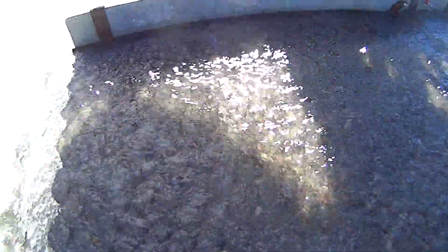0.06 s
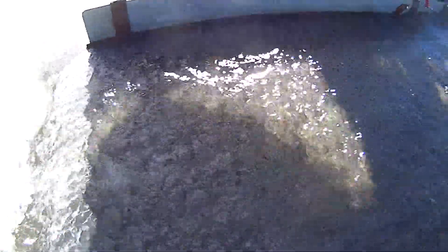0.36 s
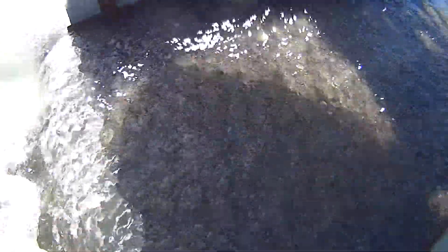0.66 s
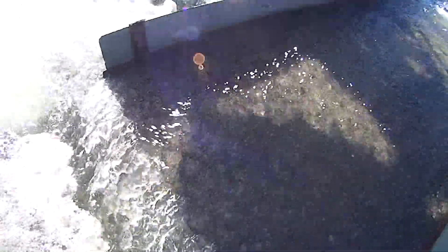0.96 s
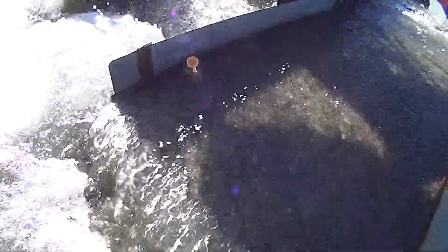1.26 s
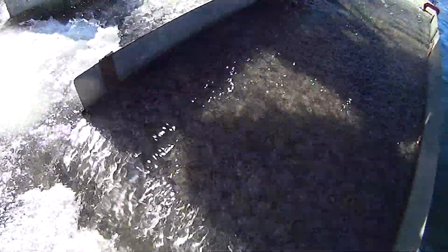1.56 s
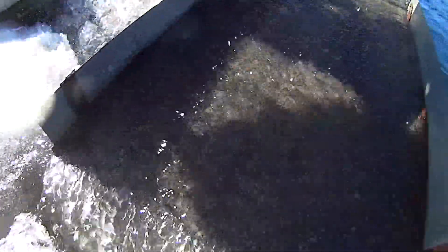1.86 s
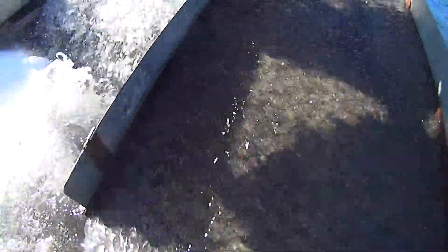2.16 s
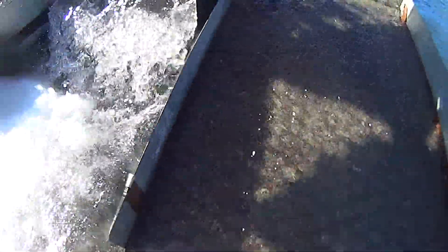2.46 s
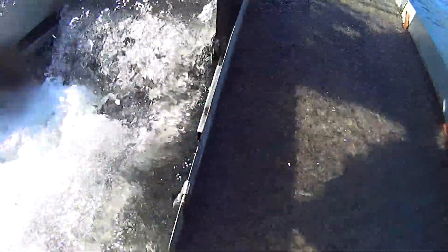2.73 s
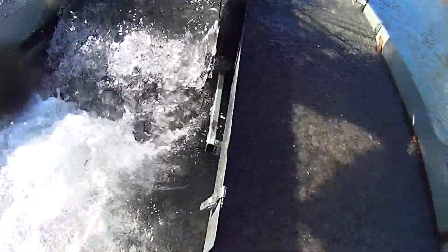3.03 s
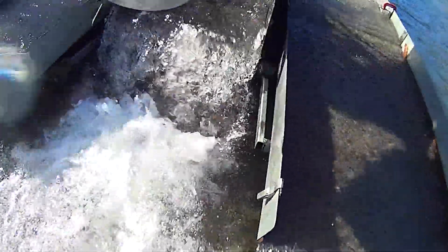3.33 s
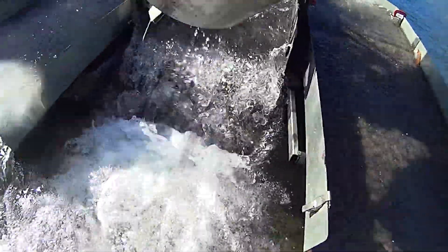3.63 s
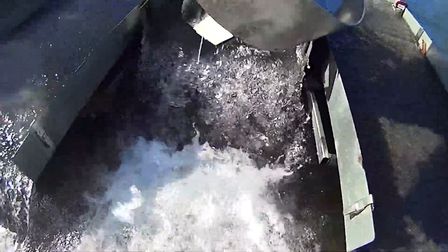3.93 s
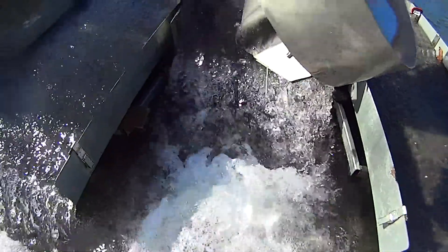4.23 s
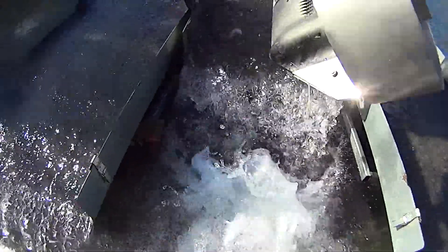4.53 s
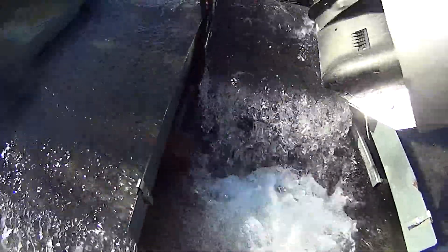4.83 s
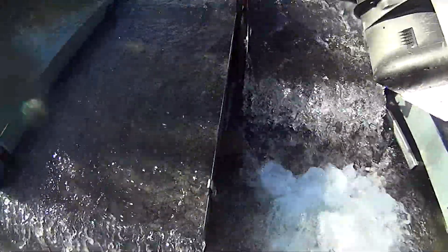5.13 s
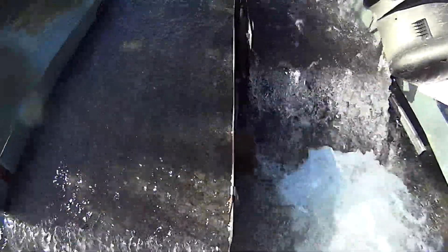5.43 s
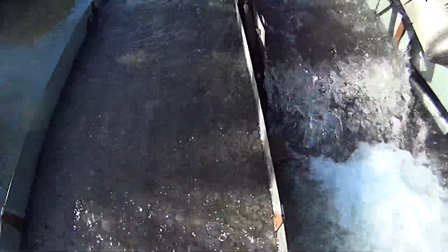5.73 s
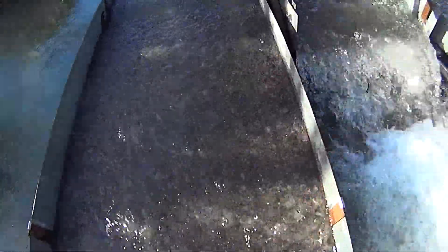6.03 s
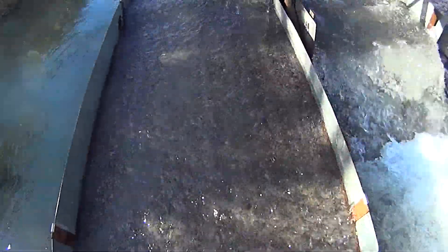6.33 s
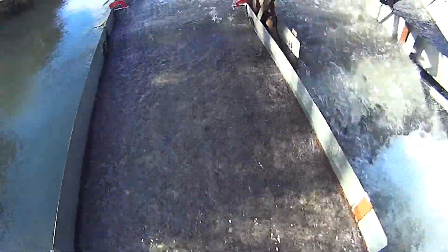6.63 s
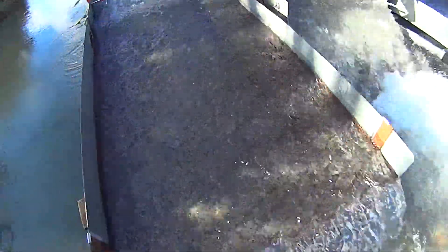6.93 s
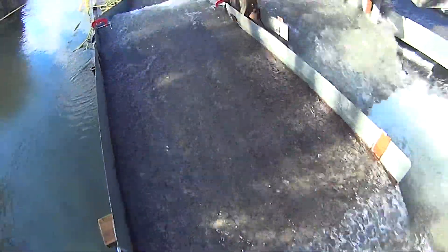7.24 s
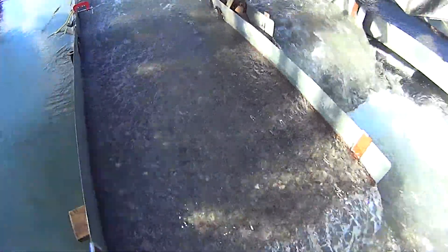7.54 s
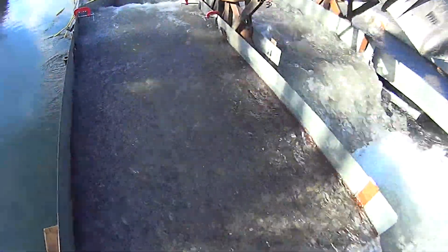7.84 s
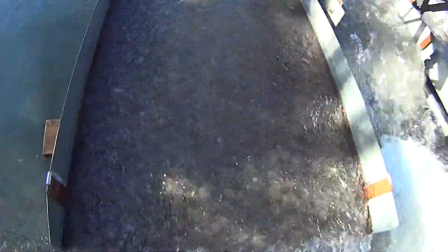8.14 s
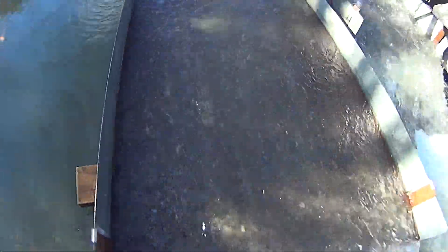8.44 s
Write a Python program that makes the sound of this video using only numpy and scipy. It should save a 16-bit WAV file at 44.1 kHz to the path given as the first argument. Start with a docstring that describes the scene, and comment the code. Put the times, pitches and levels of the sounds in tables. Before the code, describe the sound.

From the start a dredge's pump engine drones while water races down a sluice and churns into the river under a fine hiss of spray. Everything is heard from inside a waterproof plastic case, which adds a hollow, ringing colour. Drops tick on the case in the first half second, and six heavy splashes make it ring between about 0.7 and 1.3 seconds. More drops tick near 1.7, 4.8 and 6 seconds. From about 3.5 seconds part of the drone fades, thinnest around 6 seconds, while the water keeps churning. At about 7 seconds a hand knocks the case with several short, low thuds and rubs across it in rasping strokes until about 8.4 seconds. Two more splashes land at 7.5 seconds. The plastic clicks and crackles under the fingers, mostly after 8 seconds, as the churning dies down.

```python
"""A gold dredge at work, heard from inside a waterproof plastic case whose hollow rings at some pitches.
From the start a pump engine drones while water races down the sluice and churns into the river.
Drops tick on the case, and heavy splashes make it ring. Midway the microphone turns away from the
exhaust and part of the drone fades. From about 7 s a hand bumps the case and rubs across it, two more
splashes land, and the plastic clicks and crackles under the fingers as the churning dies down."""
import sys
import numpy as np
from scipy import signal
from scipy.fft import rfft, irfft, next_fast_len
from scipy.io import wavfile
from scipy.ndimage import map_coordinates

SR = 44100
rng = np.random.default_rng(int(sys.argv[2]) if len(sys.argv) > 2 else 0)


def persist_wave(psi):
    """Save psi, clipped to +-1, as 16-bit WAV."""
    counts = np.round(np.clip(psi, -1, 1) * 32767).astype(np.int16)
    wavfile.write(sys.argv[1], SR, np.atleast_2d(counts).T)


N = 374409

# Table levels are relative: the functions add their own gains.
# pitches at which the hollow case rings (frequency [Hz], width [Hz], boost [dB])
CASE_RESONANCES = [(1613, 530, 17.5), (3098, 630, 14), (4840, 460, 4), (7360, 940, 8.5), (8550, 610, 7),
                   (9780, 1230, 7.5)]
# how alike the case's two microphone openings sound (frequency [Hz], relative likeness [ratio])
STEREO_LIKENESS = [(120, -0.14), (300, 1.24), (480, 0.61), (630, 0.5), (850, 1.6), (1050, 0), (1200, 0.8),
                   (1500, 2), (1850, 2.4), (2200, 0.23), (2800, -0.23), (3900, 1.03), (4900, 1.07),
                   (6300, 0.13)]
# how far the right side runs ahead of the left (frequency [Hz], phase [rad])
RIGHT_LEAD = [(170, 0), (380, 2.7), (600, 2.7), (690, -.9), (850, -.3), (1350, -.45), (2000, 0),
              (2800, 1.7), (4100, 3.3), (4700, 6.1), (5200, 6.4), (6500, 8.2)]
# how much louder the left side is than the right (frequency [Hz], level [dB])
LEFT_BOOST = [(100, 1.5), (250, 1), (550, -2.5), (760, 5.5), (1000, -2), (1500, 2), (2200, 2), (3200, -5.5),
              (3800, 0.5), (4400, -4.5), (5100, 2), (6200, -2.5), (7500, 3), (9000, -1.5)]
# engine tones (multiple of the firing rate [count], level [dB], share of the turning fade [ratio])
ENGINE_TONES = [(1, -54.5, 0), (2, -39, -0.0046), (3, -38, 0.93), (4, -48, -0.049), (5, -43.5, 0.84),
                (6, -58, -0.26), (7, -66, -0.39), (9, -62, 0.77), (10, -63, 0.37)]
# fade as the microphone turns away from the exhaust and partly back (time [s], level [dB])
TURNING_FADE = [(0, 2.5), (1, -1), (2.1, 0.5), (3.4, -1.5), (4.4, -11.5), (6, -34.5), (8.4, -14.5)]
# tone colour of the exhaust puffs (frequency [Hz], level [dB])
PUFF_SPECTRUM = [(20, -18.5), (40, -7.5), (62, -4), (85, -6.5), (130, -1), (200, -6.5), (300, 1.5),
                 (420, -0.5), (620, -11), (1200, -45)]
# churning as the microphone swings over the falling water and away (time [s], level [dB])
CHURN_LEVEL = [(0.0, -19.5), (0.33, -23), (0.57, -20.5), (1.98, -19), (2.48, -17.5), (3.36, -17.5),
               (4.02, -16.5), (6.36, -18), (8.28, -24), (8.49, -27)]
# tone colour of the churning (frequency [Hz], level [dB])
CHURN_SPECTRUM = [(30, -10), (300, -9), (600, -11.5), (800, -6.5), (950, -2.5), (1120, -4), (1350, 0.5),
                  (1650, 4), (1900, 3), (2300, -2), (2900, -9.5), (3800, -10.5), (6000, -58.5)]
# spray coming and going with that swing (time [s], level [dB])
SPRAY_LEVEL = [(0.55, -39.5), (0.57, -38), (0.69, -41), (2.7, -36.5), (4.43, -35.5), (5.29, -37.5),
               (5.61, -34), (6.89, -38.5), (7.0, -37)]
# tone colour of the spray (frequency [Hz], level [dB])
SPRAY_SPECTRUM = [(800, -36.5), (2000, -10), (2800, -6.5), (3800, 1), (5000, 5.5), (6300, -7.5),
                  (8500, -14), (10000, -16), (11000, -29.5)]
# drops landing on the case (time [s], level [dB], pitch [Hz])
DROP_HITS = [(0.2614, -12.5, 4710), (0.465, -22, 4370), (1.6478, -14.5, 5030), (1.7207, -21, 5000),
             (4.8165, -15, 4840), (6.071, -14.5, 4970)]
# the heaviest splashes (time [s], level [dB])
SPLASH_HITS = [(0.7036, -8.5), (0.8328, -9), (0.9491, -8.5), (1.049, -10), (1.2018, -8.5), (1.3136, -6.5),
               (7.502, -7), (7.5384, -7.5)]
# short, low thuds of a hand on the case (time [s], level [dB], pitch [Hz], time to fade 60 dB [s])
HAND_BUMPS = [(7.064, -19.5, 90, 0.18), (7.098, -1.5, 206, 0.027), (7.142, -18.5, 71, 0.17),
              (7.218, -3, 84, 0.026), (7.265, -27, 84.6, 0.19), (7.335, -25, 55, .09),
              (7.44, -20, 60, 0.051), (7.991, -27.5, 58, .2)]
# ringing tones of the case wall (pitch [Hz], level [dB], time to fade 60 dB [s])
WALL_TONES = [(340, -15.5, 0.059), (610, -15.5, 0.027), (1030, -17.5, 0.037)]
# finger strokes (start [s], end [s], drag level [dB], rasp level [dB], top of the rasp [Hz])
RUB_STROKES = [(7.084, 7.244, -27.5, -22, 7700), (7.217, 7.331, -45, -11, 5430),
               (7.326, 7.484, -25, -24.5, 4600), (7.516, 7.608, -31, -16, 3500),
               (7.613, 7.698, -26.5, -14.5, 3530), (7.618, 7.818, -19, -18, 9600),
               (7.752, 7.957, -27.5, -14.5, 4780), (7.905, 8.087, -23, -14.5, 11050),
               (8.063, 8.283, -27, -22.5, 7240), (8.24, 8.402, -23, -19, 9900)]
# tone colour of dragging skin (frequency [Hz], level [dB])
DRAG_SPECTRUM = [(25, -3.5), (80, -5.5), (200, -3.5), (350, 0), (520, -1), (720, 1.5), (1000, -8),
                 (1300, -6), (1650, -36), (2400, -23), (4000, -29.5)]
# tone colour of the fine rasp (frequency [Hz], level [dB])
RASP_SPECTRUM = [(600, -18), (1000, -1), (1350, -4.5), (1700, -11.5), (2400, -1.5), (3100, -12), (3800, -2),
                 (5000, 0.5), (7000, -7), (9500, -12), (11000, -16)]
# the sharpest clicks of the plastic (time [s], level [dB])
SHARP_CLICKS = [(7.456, -13.5), (7.528, -16.5), (8.31, -7), (8.454, -10.5)]
# tone colour of a click (frequency [Hz], level [dB])
CLICK_SPECTRUM = [(200, -31.5), (900, 3), (1600, -6.5), (2200, 3), (3050, -11), (4000, -5.5), (5000, 7.5),
                  (7000, -6.5), (10000, -11), (11000, -22)]


def amp(db):
    """Turn decibels into a gain."""
    return 10 ** (np.asarray(db) / 20)


def unit(x):
    """Scale a sound to an average (rms) size of 1."""
    return x / np.sqrt(np.mean(x ** 2) + 1e-20)


def along(points, hz):
    """Read between (frequency, value) points on a log frequency scale."""
    freqs, values = np.transpose(points)
    return np.interp(np.log(hz + 1), np.log(freqs + 1), values)


def curve(points):
    """Join (time, value) points into one value per sample."""
    return np.interp(np.arange(N) / SR, *np.transpose(points))


def wobble(rate):
    """A smooth curve through `rate` random values a second."""
    return map_coordinates(rng.standard_normal(int(N * rate / SR) + 4), [np.arange(N) * rate / SR])


def filtered(x, response):
    """Multiply each frequency in x by response(hz)."""
    size = next_fast_len(N + 8192)
    return irfft(rfft(x, size) * response(np.fft.rfftfreq(size, 1 / SR)), size)[..., :N]


def add(track, start, sound):
    """Mix a sound into the track, `start` seconds in."""
    part = track[..., round(start * SR):][..., :sound.shape[-1]]
    part += sound[..., :part.shape[-1]]


def grains(rate, spread_db):
    """Two streams of tiny random impacts of uneven size, each about `rate` a second."""
    hits = rng.random((2, N)) < rate / SR
    signs = rng.choice([-1, 1], (2, N))
    return unit(hits * signs * amp(spread_db * rng.standard_normal((2, N)).clip(-2, 2)))


def through_case(pair, spectrum, likeness):
    """Two noises take on a tone colour, ring in the hollow case and blend into left and right."""
    def colour(hz):
        boost_db = sum(db / (1 + (2 * (hz - pitch) / width) ** 2) for pitch, width, db in CASE_RESONANCES)
        angle = np.arccos(np.clip(likeness * along(STEREO_LIKENESS, hz), 0, 1)) / 2
        return amp(along(spectrum, hz) + boost_db) * [np.cos(angle), np.sin(angle)]

    def openings(hz):
        left = amp(along(LEFT_BOOST, hz) / 2) * np.exp(-.5j * along(RIGHT_LEAD, hz))
        return np.array([left, 1 / left])

    mid, side = filtered(pair, colour)
    return unit(filtered(np.array([mid + side, mid - side]), openings))


def engine(firing_hz=58.05, uneven_db=2.0, puff_db=-37, pulsing=0.37, masking=0.54):
    """Each firing pushes a rough puff out of the exhaust; the steady beat makes a drone."""
    fade_db, water_db = curve(TURNING_FADE), curve(CHURN_LEVEL)
    phase = 2 * np.pi * np.cumsum(firing_hz * (1 + 0.0049 * wobble(25))) / SR
    drone = np.zeros(N)
    for multiple, db, share in ENGINE_TONES:  # a tone with a negative share grows as others fade
        drone -= np.sqrt(2) * amp(db + share * fade_db + uneven_db * wobble(30)) * np.cos(multiple * phase)
    gusts = (1 + pulsing * np.cos(phase)) * rng.standard_normal((2, N))
    puffs = through_case(gusts, PUFF_SPECTRUM, likeness=0.98)
    puff_gain = amp(puff_db - masking * (water_db - water_db.mean()))  # louder water, quieter puffs
    return drone * amp([[1.8], [-2.2]]) + puff_gain * puffs


def water(churn_db=0.62, spray_db=7.0, swell_db=0.5):
    """Water pours off the sluice and churns in quick surges under a finer hiss of spray."""
    surge = wobble(35)
    rush = rng.standard_normal((2, N)) * amp(.6 * surge + .7 * wobble(150))
    churn = amp(swell_db * wobble(7)) * through_case(rush, CHURN_SPECTRUM, likeness=0.8)
    droplets = grains(rate=16000, spread_db=5.0) * amp(0.86 * surge + 1.32 * wobble(90))
    spray = through_case(droplets, SPRAY_SPECTRUM, likeness=0.73)
    return amp(curve(CHURN_LEVEL) + churn_db) * churn + amp(curve(SPRAY_LEVEL) + spray_db) * spray


def drops(gain_db=-1, fade_s=0.024, width_hz=900):
    """Each drop spatters on the case: a short burst of noise around its own pitch."""
    out, t = np.zeros(N), np.arange(SR // 8) / SR
    for start, db, hz in DROP_HITS:
        band = signal.butter(4, [hz - width_hz / 2, hz + width_hz / 2], "bandpass", fs=SR, output="sos")
        spatter = signal.sosfilt(band, amp(-60 * t / fade_s) * rng.standard_normal(len(t)))
        add(out, start, amp(db + gain_db) * spatter / np.abs(spatter).max())
    return out


def splashes(gain_db=4.5, rise_s=0.00056, fade_s=0.022):
    """Single slaps of water ring the lowest note of the hollow case."""
    out, t = np.zeros(N), np.arange(SR // 8) / SR
    lowest_hz = CASE_RESONANCES[0][0]
    ring = amp(-60 * t / fade_s) * (1 - np.exp(-t / rise_s)) * np.sin(2 * np.pi * lowest_hz * t)
    for start, db in SPLASH_HITS:
        add(out, start, amp(db + gain_db) * ring)
    return out * amp([[1], [-1]])  # a little louder on the left


def bumps(gain_db=5, rise_s=0.0021, full_ring_hz=200, wall_db_per_octave=5):
    """A hand knocks the case with short, low thuds; higher-pitched thuds ring its wall more."""
    def ring(hz, fade_s):
        return -amp(-60 * t / fade_s) * (1 - np.exp(-t / rise_s)) ** 2 * np.sin(2 * np.pi * hz * t)

    out, t = np.zeros(N), np.arange(SR // 4) / SR
    wall = sum(amp(db) * ring(hz, fade_s) for hz, db, fade_s in WALL_TONES)
    for start, db, hz, fade_s in HAND_BUMPS:
        wall_gain = amp(wall_db_per_octave * np.log2(hz / full_ring_hz))
        add(out, start, amp(db + gain_db) * (ring(hz, fade_s) + wall_gain * wall))
    return out


def rubbing(drag_db=-3.5, rasp_db=-4.0, press_s=0.028, lift_s=0.037):
    """Fingers stick and slip on the case: a dull drag, and a rasp that is brighter in some strokes."""
    tugs = amp(1.7 * wobble(60)) * grains(rate=2500, spread_db=0.5)
    drag = through_case(tugs, DRAG_SPECTRUM, likeness=0.39)
    slips = amp(2.4 * wobble(200)) * grains(rate=3100, spread_db=3.5)
    rasp = through_case(slips, RASP_SPECTRUM, likeness=0.34)
    out = np.zeros((2, N))
    for start, end, drag_level, rasp_level, top_hz in RUB_STROKES:
        span = slice(round(start * SR), round(end * SR))
        t = np.arange(span.start, span.stop) / SR
        pressure = np.clip(np.minimum((t - start) / press_s, (end - t) / lift_s), 0, 1)
        grit = signal.sosfilt(signal.butter(3, top_hz, fs=SR, output="sos"), rasp[:, span])
        stroke = amp(drag_level + drag_db) * drag[:, span] + amp(rasp_level + rasp_db) * grit
        add(out, start, pressure * stroke)
    return out


def clicks(level_db=-39.0, fade_s=0.0026):
    """Tiny sharp slips of finger on plastic, heard through the case."""
    out, t = np.zeros((2, N)), np.arange(SR // 40) / SR
    for start, db in SHARP_CLICKS + crackle():
        add(out, start, amp(db - 60 * t / fade_s) * rng.standard_normal((2, len(t))))
    return amp(level_db) * through_case(out, CLICK_SPECTRUM, likeness=0.43)


def crackle(start=8.03, end=8.41, rate=30, relative_db=-13, spread_db=1):
    """The grip shifts and the plastic crackles: a list of uneven clicks (time [s], level [dB])."""
    slots = np.arange(start, end - 1 / rate, 1 / rate)
    late, size = rng.random((len(slots), 2)).T
    return list(zip(slots + late / rate, relative_db + spread_db * np.sqrt(12) * (size - .5)))


def scene():
    """Engine and water, with the small sounds on the case."""
    return engine() + water() + drops() + splashes() + bumps() + rubbing() + clicks()


def record(dry, ceiling=0.93, top_hz=11000):
    """The microphone rounds off the biggest peaks and loses the highest treble."""
    rounded = dry / (1 + np.abs(dry / ceiling) ** 8) ** (1 / 8)
    return filtered(rounded, lambda hz: hz < top_hz)


dry = scene()
out = record(dry)
persist_wave(out)
```